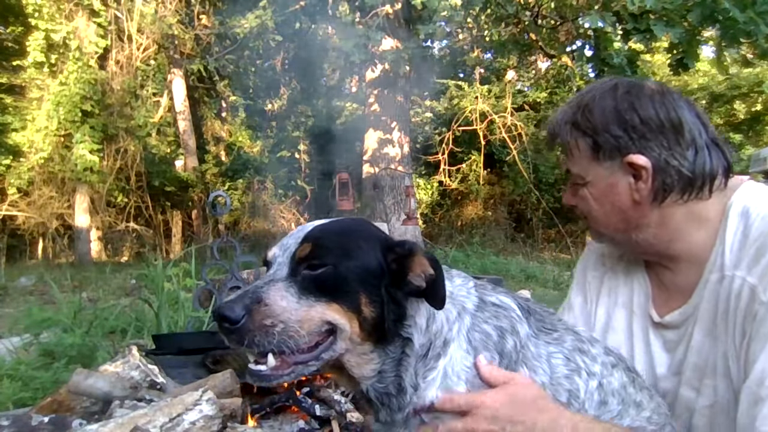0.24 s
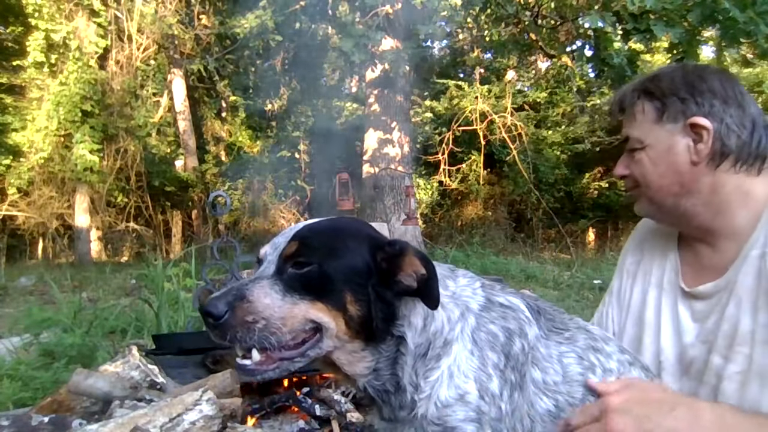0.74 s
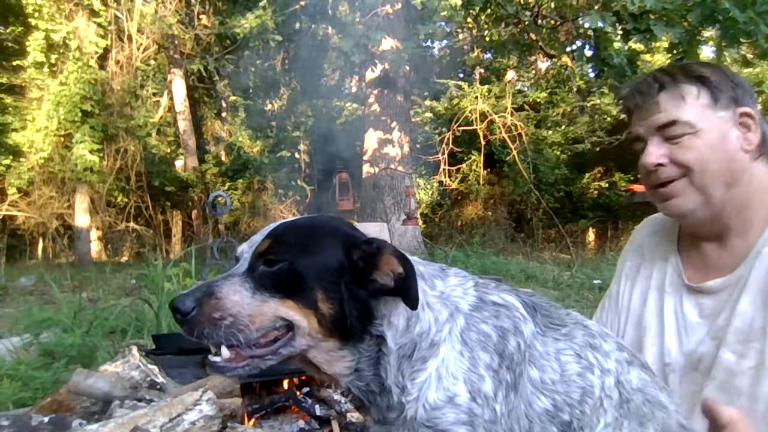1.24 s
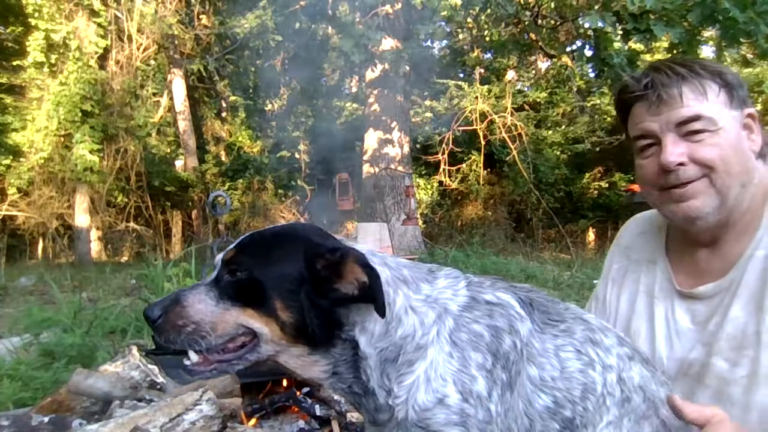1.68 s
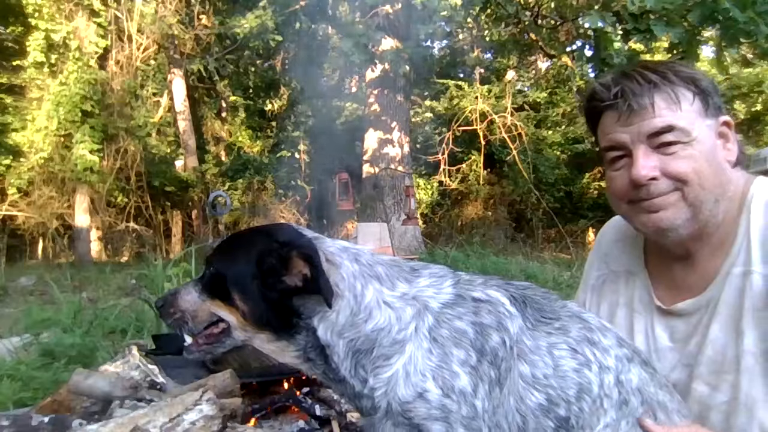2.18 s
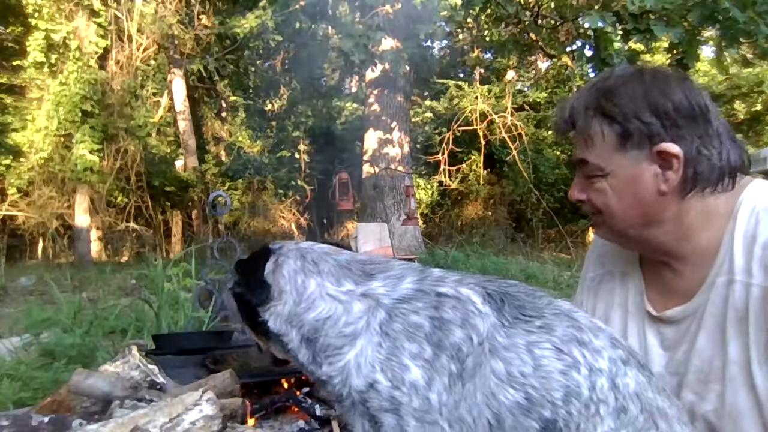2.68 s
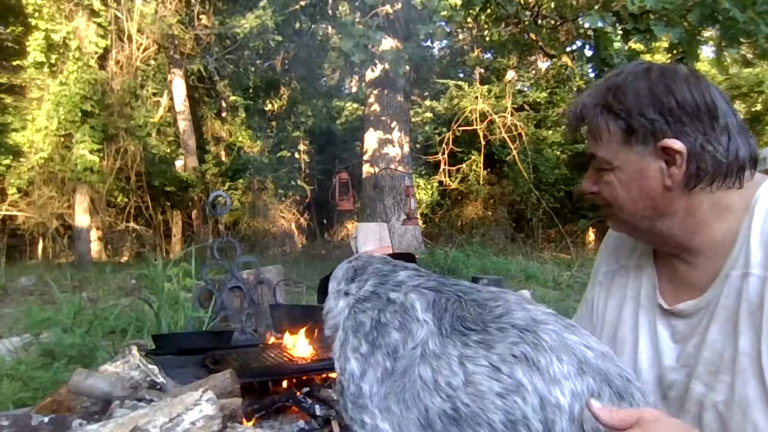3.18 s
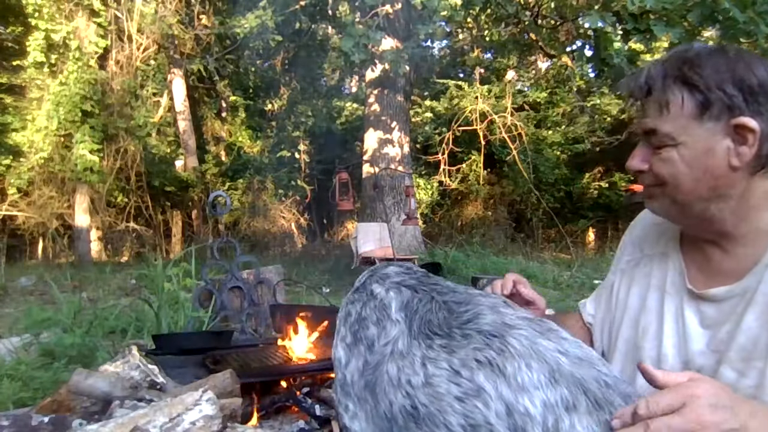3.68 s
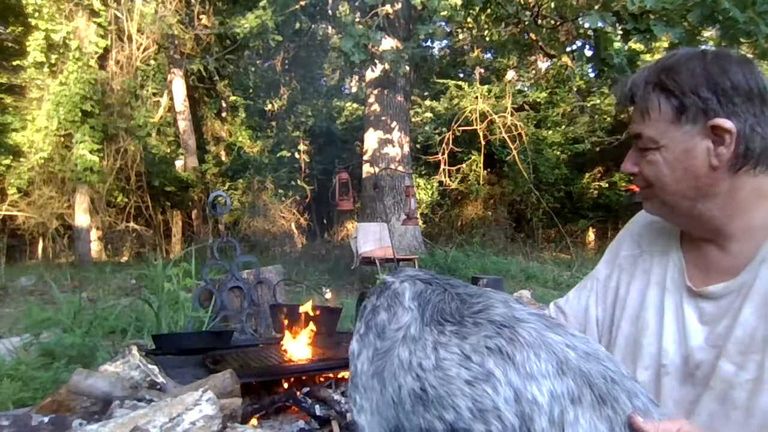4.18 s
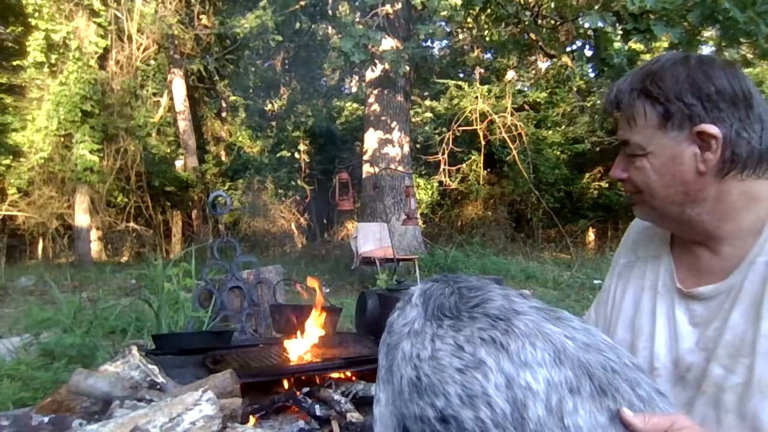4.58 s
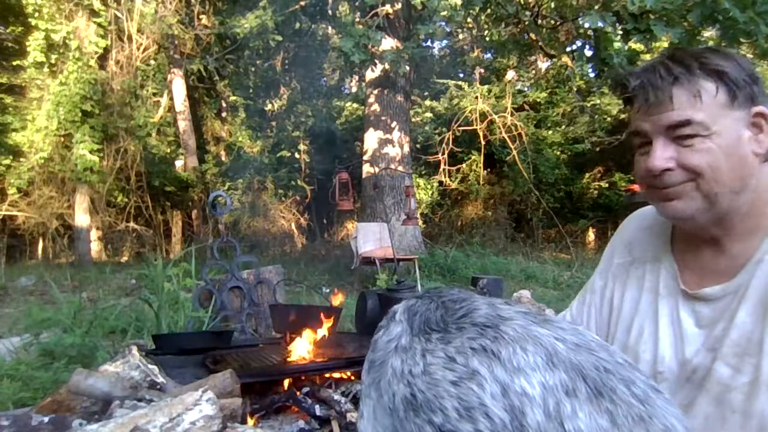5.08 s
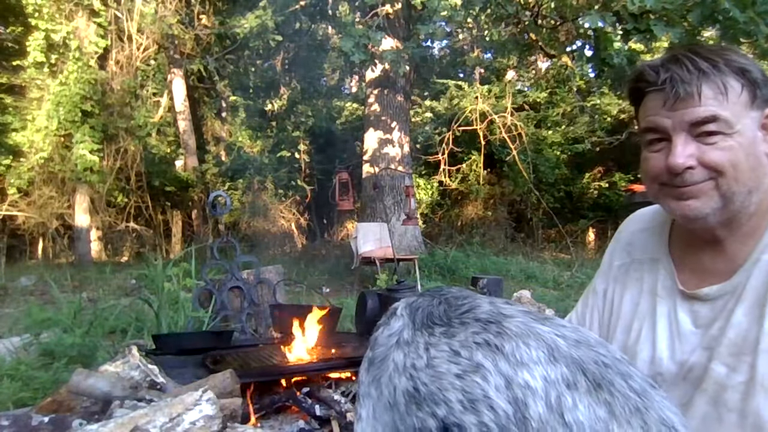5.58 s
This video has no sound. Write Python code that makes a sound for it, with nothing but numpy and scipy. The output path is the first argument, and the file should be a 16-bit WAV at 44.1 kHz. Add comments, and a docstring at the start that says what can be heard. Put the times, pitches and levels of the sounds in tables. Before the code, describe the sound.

Crickets hiss steadily around a snapping campfire while a hand pats a dog, and a distant rooster crows and another dog barks.

```python
"""A camp fire flutters and puffs, and its logs snap as pockets of sap burst.
It is evening at the edge of a wood: crickets scrape their wings in a hissing chorus and one katydid throbs.
A hand pats a dog five times. Far off, a rooster crows in a thin, wavering whistle and another dog
yips and barks twice, hoarsely. The trees throw the sounds back."""
import sys
import numpy as np
from scipy import signal
from scipy.io import wavfile
from scipy.ndimage import uniform_filter1d

SR = 44100
rng = np.random.default_rng(int(sys.argv[2]) if len(sys.argv) > 2 else 0)


def output_pcm(signal):
    """Save a mono or channel-first signal as 16-bit PCM at the path in sys.argv[1].

    Samples are clipped to [-1, 1] before scaling.
    """
    pcm = np.clip(np.atleast_2d(signal).T, -1, 1) * 32767
    wavfile.write(sys.argv[1], SR, np.round(pcm).astype(np.int16))


N = 257540
T = np.arange(N) / SR


def gain_of(db):
    """Turns decibels into a number to multiply by."""
    return 10 ** (np.asarray(db) / 20)


def unit_rms(x):
    """Scales a sound so its average strength (rms) is 1."""
    return x / np.sqrt(np.mean(x ** 2) + 1e-20)


def unit_peak(x):
    """Scales a sound so its peak is 1."""
    return x / abs(x).max()


def wobble(count, size):
    """A random drift, smoothed over size samples."""
    return unit_rms(uniform_filter1d(rng.standard_normal(count), size=size))


def at_pitch(rows, hz):
    """Looks up a value between rows that start with a frequency."""
    row_hz, value = np.transpose(rows)
    return np.interp(np.log(hz + 1), np.log(row_hz + 1), value)


def level(rows):
    """Joins rows of seconds and dB into a volume curve."""
    return gain_of(np.interp(T, *np.transpose(rows)))


def add(mix, start, sound):
    """Mixes a sound in, start seconds from the beginning."""
    part = mix[..., round(start * SR):][..., :sound.shape[-1]]
    part += sound[..., :part.shape[-1]]


def band(x, low_hz, high_hz):
    """Keeps the sound between two frequencies."""
    sos = signal.butter(2, [low_hz, min(high_hz, 20000)], "bandpass", fs=SR, output="sos")
    return signal.sosfilt(sos, x)


def resonate(x, rows):
    """Makes a sound ring at each row's frequency."""
    out = 0
    for hz, width, db in rows:
        pole = np.exp((2j * np.pi * hz - np.pi * width) / SR)
        once = signal.lfilter([1 - abs(pole)], [1, -pole], x + 0j)
        out = out + gain_of(db) * 2 * signal.lfilter([1 - abs(pole)], [1, -pole], once).real
    return out


def place(x, lead, pan_db):
    """Makes stereo: the left ear hears it lead samples earlier and pan_db louder."""
    return np.array([x, np.roll(x, lead)]) * gain_of([[pan_db / 2], [-pan_db / 2]])


def burst(ring_s, rise_s):
    """A short burst of noise that fades by 60 dB in ring_s."""
    t = np.arange(2000) / SR
    return rng.standard_normal(2000) * gain_of(-60 * t / ring_s) * (1 - np.exp(-(t / rise_s) ** 2))


# How alike the two ears hear a sound. Each row: frequency in Hz, likeness from 0 to 1.
EAR_LIKENESS = [(60, 0.89), (180, 1), (550, 0.89), (1650, 0.19), (4970, 0.0308), (15000, 0.28)]
def noise(spectrum, patchy_db, size=1024, top_hz=15800):
    """Stereo noise with a given tone colour, in which louder and softer patches drift."""
    frames, hz = 4 * N // size + 5, np.fft.rfftfreq(size, 1 / SR)
    a, b, c, d, patches = rng.standard_normal((frames, len(hz), 5)).T
    patches = unit_rms(uniform_filter1d(uniform_filter1d(patches, size=10, axis=0), size=8, axis=1))
    alike = np.clip(at_pitch(EAR_LIKENESS, hz), -1, 1)[:, None]
    left = a + 1j * b
    right = alike * left + np.sqrt(1 - alike ** 2) * (c + 1j * d)
    colour = gain_of(at_pitch(spectrum, hz)[:, None] + patchy_db * patches) * (hz < top_hz)[:, None]
    _, sound = signal.istft(np.array([left, right]) * colour, nperseg=size, noverlap=size * 3 // 4)
    return unit_rms(sound[:, :N])


# The flames' tone colour. Each row: frequency in Hz, relative level in dB.
FLAME_SPECTRUM = [(8.8, -44), (15, 6.5), (59, 3.5), (144, 1.5), (461, -15), (520, -17), (720, -20),
                  (900, -44), (1170, -29.5), (1980, -120)]
# The flames rise and sink. Each row: time in seconds, level in dB.
FLAME_LEVEL = [(0.0, -62), (1.5, -61), (1.9, -55.5), (2.15, -57.5), (2.6, -59.5), (3.0, -58), (3.35, -59),
               (3.55, -56.5), (4.2, -58.5), (5.0, -60), (5.45, -57), (5.84, -58)]
# Puffs of burning gas. Each row: middle in seconds, level in dB, upper frequency in Hz.
GAS_PUFFS = [(0.292, -60.5, 810), (0.434, -61, 328), (0.542, -63.5, 855), (1.924, -43, 300),
             (2.032, -46.5, 276), (2.689, -58, 2500), (4.019, -54, 297.6), (4.868, -60.5, 205)]
def fire(puff_s=.094):
    """Flames flutter low, gas burns in soft puffs, and a few faint ticks crackle."""
    flames = level(FLAME_LEVEL) * noise(FLAME_SPECTRUM, patchy_db=.61, size=2048)
    n = round(puff_s * SR)
    for middle, db, top_hz in GAS_PUFFS:
        rush = unit_rms(band(rng.standard_normal(8000), 65, top_hz))[-n:]
        add(flames, middle - puff_s / 2, place(gain_of(db) * np.hanning(n) * rush, lead=2, pan_db=0))
    tick_db = -44 + 2.6 * np.minimum(rng.exponential(1, (2, N)), 2)
    ticks = gain_of(tick_db) * (rng.random(N) < 9 / SR)  # about nine a second
    return flames + band(ticks, 7500, 11000)


# The background's tone colour. Each row: frequency in Hz, relative level in dB.
AIR_SPECTRUM = [(150, -47), (250, 2.5), (373, -14), (519, -5.5), (685, -18.5), (873, -10), (1110, -12.5),
                (1300, -12), (2120, -16.5), (3270, -12), (6010, -3.5), (6910, 7.5), (8960, -13.5),
                (15100, -13), (15900, -3)]
def evening_air():
    """Still air and far insects blend into a faint, steady hiss."""
    return gain_of(-54.5) * noise(AIR_SPECTRUM, patchy_db=1)


# The chorus swells and eases. Each row: time in seconds, level in dB.
CRICKET_LEVEL = [(0.0, -56.5), (0.4, -56), (2.2, -57.5), (3.6, -55), (4.8, -58.5), (5.84, -56.5)]
# Where the wings ring. Each row: frequency in Hz, width in Hz, relative level in dB.
WING_RESONANCES = [(7030, 290, 1.5), (6730, 480, -4.5), (7263, 470, 0)]
def crickets():
    """Many crickets scrape at once: tiny teeth click unevenly and make the wings ring."""
    clicks = rng.standard_normal((2, N)) * gain_of(2 * rng.exponential(1, (2, N)))
    clicks *= gain_of(1.7 * wobble(N, size=5000))  # singers drift in and out of step
    return level(CRICKET_LEVEL) * unit_rms(resonate(clicks, WING_RESONANCES))


# The katydid's tone colour. Each row: frequency in Hz, relative level in dB.
KATYDID_SPECTRUM = [(9000, -30.5), (11000, -24.5), (13000, -16), (15000, -9.5), (15800, -8.5)]
# Its loudness. Each row: time in seconds, level in dB before each ear is turned down.
KATYDID_LEVEL = [(0.0, -61), (0.68, -53), (1.6, -54.5), (2.5, -56), (3.12, -56.5), (3.74, -52.5),
                 (4.2, -53.5), (5.84, -54)]
# Its wings slow down as it sings. Each row: time in seconds, strokes a second.
STROKE_RATE = [(0, 24.08), (3.7, 23.67), (3.9, 23.37), (5.3, 23.37), (5.84, 23.0)]
def katydid():
    """Each wing stroke swells and stops short; no two are quite as strong."""
    strokes_done = np.cumsum(np.interp(T, *np.transpose(STROKE_RATE))) / SR + .032
    depth_db = 9 + 1.2 * wobble(N, size=3000)
    throb = uniform_filter1d(gain_of(depth_db * ((strokes_done % 1) ** .8 - .6)), 200)
    song = unit_rms(throb * noise(KATYDID_SPECTRUM, patchy_db=.6, size=256))
    return level(KATYDID_LEVEL) * gain_of([[-2.5], [-.5]]) * song


def air_push(hz):
    """A low push of air: the pressure jumps, then relaxes."""
    phase = np.arange(2000) / SR * hz * 2 * np.pi
    return unit_peak(band(phase * np.exp(-phase), 110, 2.2 * hz))


# Where splitting wood rings; the first row is the knock, the rest are the crack.
# Each row: frequency in Hz, width in Hz, relative level in dB.
LOG_RESONANCES = [(3240, 1078, -5), (6000, 3300, 8), (4480, 750, -4.5), (6760, 6600, -1)]
# Each row: start in seconds, crack level in dB before panning, then knock, push and treble
# in dB compared with the crack, and how many dB louder the left ear is.
LOG_SNAPS = [(0.502, -55.5, -17, 9, 25, -2), (.762, -44, -17, -15, 12, -2), (.959, -58, -13, -8, 0, -4),
             (1.501, -32, -28, -13.5, 10, 2), (1.62, -56.5, -20, -25, 22, 0),
             (1.657, -52, -15, -23, 24, -1), (2.517, -41.5, -10, 1, 5, -0.5), (3.274, -31, -6, -9, 10, -2),
             (3.697, -1, -3.5, -4.5, -8.5, 0), (3.953, -47.5, -7, 1, -8, 0),
             (4.619, -44, -23.5, -5, 12.5, -0.5), (5.01, -54, -21.5, -16, 13, 0.5),
             (5.536, -47, -4.5, -11, 12, 0), (5.562, -37.5, -14, -24, -9, 0),
             (5.83, -51, -3.5, -12, 7.5, 2)]
def log_snaps():
    """A pocket of sap bursts: fibres crack, the log knocks and pushes the air, and the trees answer."""
    out, clicks = np.zeros((2, N)), np.zeros(N)
    for start, db, knock_db, push_db, treble_db, pan_db in LOG_SNAPS:
        ring_s = .008 + .011 * gain_of(db)  # louder snaps ring longer
        rise_s = ring_s / 7
        splits = burst(ring_s, rise_s), burst(ring_s, rise_s)
        knock = unit_peak(resonate(burst(ring_s / 2, .00016), LOG_RESONANCES[:1]))
        body = gain_of(knock_db) * knock + gain_of(push_db) * air_push(hz=1495)
        for ear, split in enumerate(splits):
            crack = unit_peak(resonate(split, LOG_RESONANCES[1:]))
            treble = gain_of(treble_db) * unit_peak(band(split, 6500, 20000))
            add(out[ear], start, gain_of(db + (1.5 - ear) * pan_db) * (crack + treble))
            add(out[ear], start + rise_s, gain_of(db + (3 - ear) * pan_db) * body)
        clicks[round(start * SR)] = gain_of(db)
    return out + gain_of(-1) * tree_echo(band(clicks, 2800, 12064), gap_s=.012, stretch=.496)


# How long the wood echoes. Each row: frequency in Hz, seconds to fade by 60 dB when stretch is 1.
ECHO_TIMES = [(300, 0.22), (800, 1.724), (2000, 1.35), (5000, 1.06), (12000, 0.23)]
def tree_echo(x, gap_s, stretch=1):
    """Trunks send back many tiny echoes after gap_s; near trunks (a small stretch) die away sooner."""
    echoes = np.zeros((3, 2 * SR))  # left, right and shared
    slots = np.arange(0, 2 * SR - 20, 20)  # one echo in every 20 samples
    arrivals = slots + rng.integers(0, 20, (3, len(slots)))
    np.put_along_axis(echoes, arrivals, rng.choice([-1., 1.], arrivals.shape), 1)
    hz, t, spectra = signal.stft(echoes * (np.arange(2 * SR) > gap_s * SR), SR, nperseg=512)
    spectra *= gain_of(-60 * t / (stretch * at_pitch(ECHO_TIMES, hz)[:, None]))
    alike = np.clip(at_pitch(EAR_LIKENESS, hz), 0, 1)[:, None]  # long waves reach both ears alike
    spectra = np.sqrt(alike) * spectra[2] + np.sqrt(1 - alike) * spectra[:2]
    _, tail = signal.istft(spectra, SR, nperseg=512)
    return signal.fftconvolve(x[None], tail / np.linalg.norm(tail[0]), axes=1)[:, :N]


# Each row: landing time in seconds, slap level in dB, then thud, tick and rub in dB compared with
# the slap, and the slap's upper frequency in Hz.
HAND_PATS = [(1.197, -36, -6, 5.5, -22.5, 3230), (1.349, -21.5, -27, -3, -39, 4650),
             (1.586, -18.5, -9.5, 3.5, -53, 2780), (1.796, -15, -11.5, -0.5, -28.5, 2260),
             (1.996, -23.5, -2, -1, -30, 2360)]
def hand_pats():
    """The palm brushes the fur, then lands with a thud, a slap and a late bright tick."""
    out = np.zeros(N)
    for lands, db, thud_db, tick_db, rub_db, top_hz in HAND_PATS:
        slap = band(burst(.011, .00077), 690, top_hz)
        slap += .18 * band(burst(.0035, .00056), 2900, 11400)
        thud = gain_of(thud_db) * unit_peak(band(burst(.0164, .0008), 220, 767))
        tick = unit_peak(band(burst(.0079, .00034), 7400, 14600))
        rub = signal.windows.tukey(1500, .4) * unit_rms(band(rng.standard_normal(1500), 350, 3500))
        add(out, lands - .023, gain_of(db + rub_db) * rub)
        add(out, lands - .001, gain_of(db) * (unit_peak(slap) + thud))
        add(out, lands + .00048, gain_of(db + tick_db) * tick)
    return out


def voice(hz, gains, waver):
    """Tones at 1, 2, 3.. times a wavering pitch, with one gain for each."""
    cycles = np.cumsum(hz * (1 + waver * wobble(len(hz), size=300))) / SR
    return np.sqrt(2) * sum(gain * np.sin(2 * np.pi * k * cycles) for k, gain in enumerate(gains, 1))


# The crow's syllables. Each row: start and length in seconds, first, early and late pitch in Hz,
# level of the octave above in dB, lowest tone in dB compared with that, level change in dB a second,
# waver as a share of the pitch.
CROW_SYLLABLES = [(2.017, .1, 679, 656, 659, -61, -9, -120, .015),
                  (2.232, .1, 901, 964, 954.5, -63.5, 2.5, -74, .035),
                  (2.416, 0.13, 896, 924, 925, -57.5, -6.5, -58, .025),
                  (2.524, .24, 1017, 1050, 1030, -60.5, -4.5, -25, .015),
                  (2.78, 1.12, 897, 878, 814, -64.5, -15.5, -0.5, 0.0042)]
def rooster_crow(slide_s=.035, swell_s=.04, end_s=.04, droop=.95):
    """Each syllable is a thin whistle that slides in, swells, flutters and droops."""
    out = np.zeros(N)
    for start, length, first_hz, early_hz, late_hz, db, low_db, fade, waver in CROW_SYLLABLES:
        t = np.arange(0, length, 1 / SR)
        hz = np.interp(t, [0, slide_s, length - end_s, length],
                       [first_hz, early_hz, late_hz, droop * late_hz])
        shape = np.minimum(t / swell_s, 2 * (length - t) / end_s).clip(max=1) * gain_of(db + fade * t)
        flutter = gain_of(2.5 * wobble(len(hz), size=900))
        gains = [gain_of(low_db), 1, gain_of(-7) * (3 * hz < 2200)]  # the air dulls the top tone
        add(out, start, shape * flutter * voice(hz, gains, waver))
    return out


# A yip, then two barks. Each row: first, early and late pitch in Hz, then the octave above
# in dB compared with the lowest tone, with the mouth shut and with it open.
BARK_PITCHES = [(223.8, 321, 318, -17.5, 28), (358.3, 434, 410, -15, 6.1), (342.8, 440, 447, -13, 0.8)]
# One list for each call. Each row: time in seconds, main voice in dB, second voice in Hz and in dB.
BARK_EFFORT = [
    [(2.822, -58, 495, -83), (2.845, -41, 500, -80.5), (2.858, -28.5, 509.3, -80), (2.872, -64, 490, -80)],
    [(2.852, -58, 587, -70), (2.88, -31, 593.6, -33), (2.9, -31, 553, -28), (2.93, -31.5, 466, -23),
     (2.96, -30.5, 469, -22), (2.98, -26, 469.3, -25.5), (3.0, -44, 520, -24.5), (3.02, -37, 465, -31),
     (3.028, -45, 450, -46), (3.045, -50, 396, -65)],
    [(4.452, -46.5, 587, -68), (4.475, -36.5, 626.4, -56), (4.495, -30, 633.4, -40),
     (4.515, -31, 537.4, -25.5), (4.53, -25.5, 569.6, -48), (4.548, -34, 521.7, -17),
     (4.566, -26.5, 530.4, -33), (4.586, -37, 495.4, -19), (4.603, -29.5, 479, -33), (4.61, -34, 450, -41),
     (4.63, -46, 321, -60)],
]
# Where the throat rings. Each row: frequency in Hz, width in Hz, relative level in dB.
THROAT_RESONANCES = [(490, 250, -17), (619.6, 570, 5), (917, 220, 1), (1237, 273, -1), (1609, 260, -5),
                     (4975, 2160, -27)]
def dog_barks(open_s=.06984, close_s=.026, drop=.75):
    """The vocal folds buzz hoarsely, a second vibration slides down, and air rasps in the throat."""
    out = np.zeros(N)
    for (first_hz, early_hz, late_hz, shut_db, open_db), effort in zip(BARK_PITCHES, BARK_EFFORT):
        times, *columns = np.transpose(effort)
        start, end = times[0], times[-1]
        t = np.arange(start, end, 1 / SR)
        db, second_hz, second_db = (np.interp(t, times, column) for column in columns)
        # the pitch climbs as the mouth opens, then drops and roughens as it shuts
        mouth = [start, min(start + open_s, times[-2]), max(end - close_s, times[-2]), end]
        hz = np.interp(t, mouth, [first_hz, early_hz, late_hz, drop * late_hz])
        rough = np.interp(t, mouth, [.098, .098, .098, .49])
        brightness = gain_of(np.interp(t, mouth, [shut_db, open_db, open_db, shut_db]))
        low = gain_of(db) / np.sqrt(1 + brightness ** 2)
        octave, second_gain = brightness * low, gain_of(second_db)
        breath = resonate(rng.standard_normal(len(t)), THROAT_RESONANCES)
        rasp = unit_rms(band(band(breath, 358, 8000), 480, 8200))
        rasp *= 2.91 * rough * np.hypot(gain_of(db), second_gain)
        hoarse = 1 + 1.2 * rough * wobble(len(t), size=250)  # uneven cycles blur the tones
        second_hoarse = 1 + .7 * rough * wobble(len(t), size=200)
        weak_tone = voice(hz + second_hz / 2, [gain_of(-18) * np.sqrt(octave * second_gain)], waver=.017)
        main = hoarse * voice(hz, [low, octave, gain_of(-13.5) * octave], waver=.022)
        second = second_hoarse * voice(second_hz, [second_gain], waver=.012)
        add(out, start, (main + second + weak_tone + rasp) * signal.windows.tukey(len(t), .1))
    return out


def scene():
    """Mixes it all: the near hand is mostly heard directly, the far animals with more echo."""
    hand, dog, rooster = hand_pats(), dog_barks(), rooster_crow()
    # a wall of trunks returns the upper part of each bark
    dog += gain_of(-.5) * np.roll(band(dog, 1050, 2300), round(.055 * SR))
    far = place(dog, lead=9, pan_db=-.14) + gain_of(-15.5) * tree_echo(dog, gap_s=.0071)
    far += place(rooster, lead=0, pan_db=0) + gain_of(-1.5) * tree_echo(rooster, gap_s=.0462, stretch=.94)
    near = log_snaps() + place(hand, lead=3, pan_db=1) + gain_of(-28) * tree_echo(hand, gap_s=.0014)
    return far + near + evening_air() + crickets() + katydid() + fire()


def record(dry):
    """Clips the loudest peaks, then removes the treble above 16450 Hz."""
    low_pass = signal.firwin(511, 16450, window=("kaiser", 9), fs=SR)
    return signal.oaconvolve(np.clip(dry, -.97, .97), low_pass[None], "same")


dry = scene()
out = record(dry)
output_pcm(out)
```